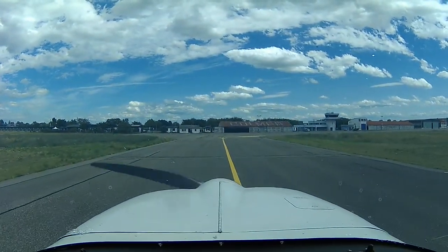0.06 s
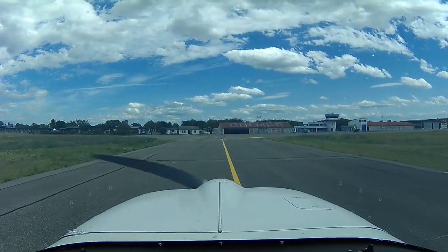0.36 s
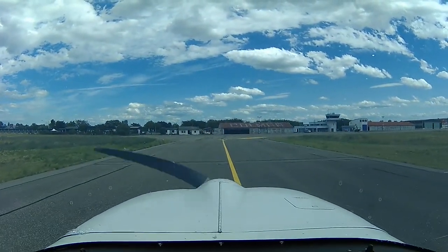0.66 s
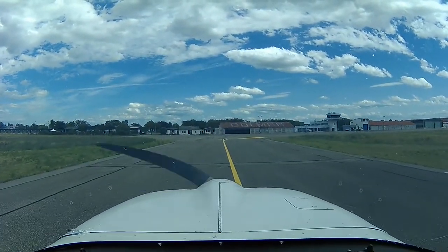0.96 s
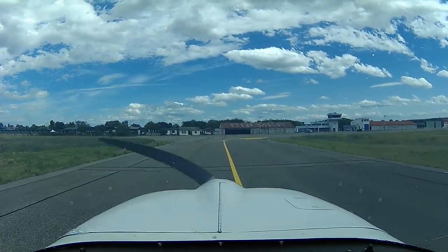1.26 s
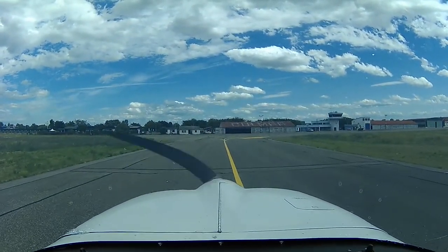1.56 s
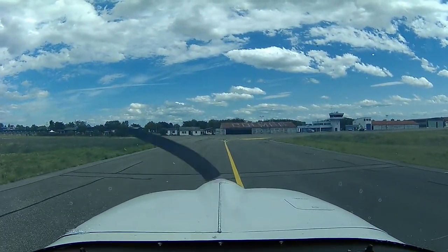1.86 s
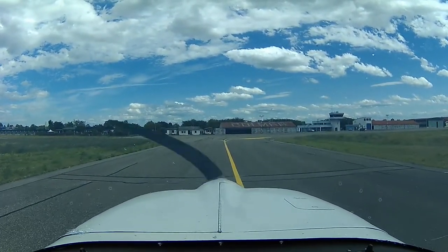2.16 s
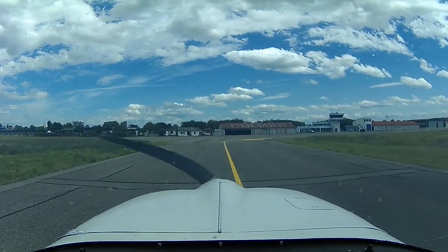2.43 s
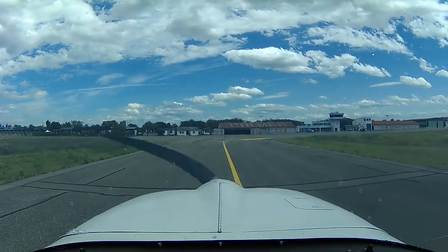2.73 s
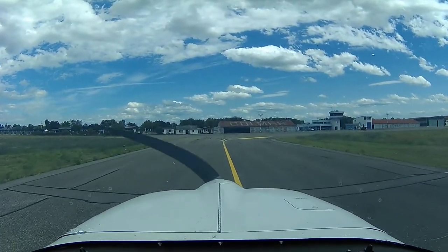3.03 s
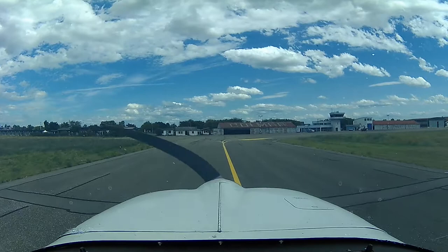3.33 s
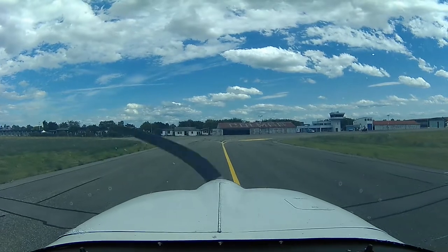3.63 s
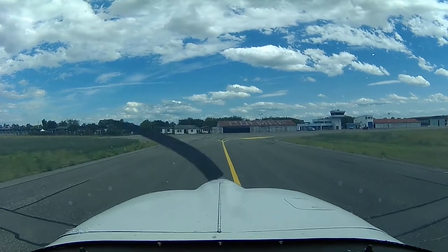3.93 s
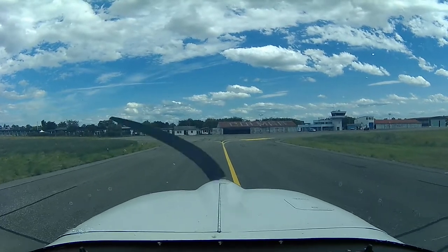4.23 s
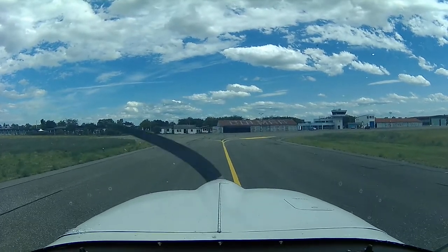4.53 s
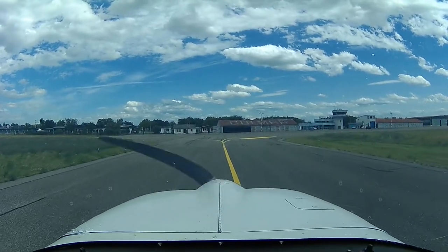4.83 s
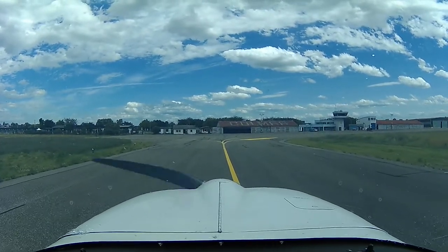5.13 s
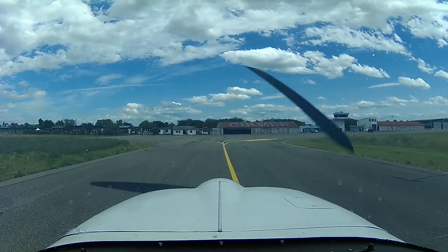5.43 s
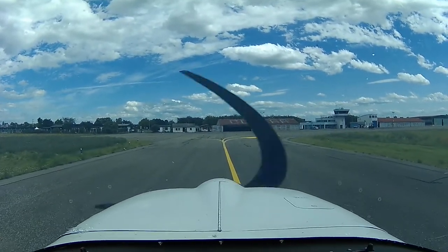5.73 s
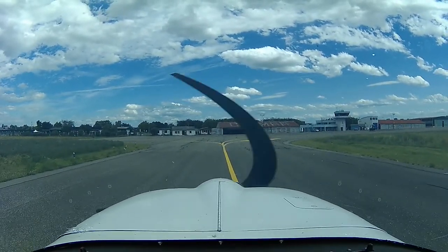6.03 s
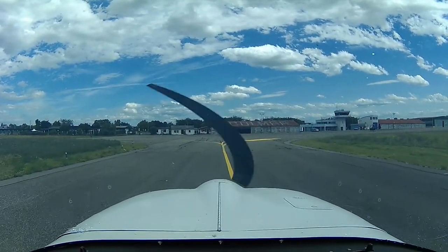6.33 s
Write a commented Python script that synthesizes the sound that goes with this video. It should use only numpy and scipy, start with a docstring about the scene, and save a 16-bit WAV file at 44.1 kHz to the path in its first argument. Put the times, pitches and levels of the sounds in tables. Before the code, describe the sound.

From the cockpit of a small taxiing plane comes a continuous, deep engine and propeller drone at nearly constant speed. A rough, fluttering roar of air and exhaust rides on it, distorted and harsh through a small overloaded microphone. Rolling rumble, tyre hum and slight bumps lie beneath, with scattered light ticks from the cabin trim. The roar and tyre hum grow slightly in the second half, then ease.

```python
"""A light aircraft's propeller and engine boom through the cockpit as it taxis at low power.
Under the drone sits a roar of prop wash and exhaust; the tyres hum, pavement joints jolt the
airframe, and loose trim ticks now and then. The boom overloads a small microphone: each swing
pins it and chops the roar into a rasp, which rings in the microphone."""
import sys
import numpy as np
from scipy import signal
from scipy.fft import rfft, irfft
from scipy.io import wavfile
from scipy.ndimage import uniform_filter1d

SR = 44100
rng = np.random.default_rng(int(sys.argv[2]) if len(sys.argv) > 2 else 0)


def to_wav(sig):
    """Store sig (one row per channel, or 1-D mono) as 16-bit WAV at the path in sys.argv[1].

    Samples outside -1..1 are clipped; the rate is SR.
    """
    pcm = np.clip(np.atleast_2d(sig), -1, 1) * 32767
    pcm = np.round(pcm).astype(np.int16)
    wavfile.write(sys.argv[1], SR, pcm.T)  # frames by channels


N = 290619
TIME = np.arange(N) / SR

# bright ring of the loose trim: freq_hz, relative_db
TRIM_SPECTRUM = [(1000, -41.5), (3000, 2.5), (4500, 0.5), (5600, 10), (7000, -25), (14000, -17)]
# the clear trim ticks: start_s, level_db
TRIM_TICKS = [(0.492, -24), (2.408, -20.5), (2.533, -32), (3.281, -25), (3.843, -25), (3.998, -28),
              (5.033, -26), (6.029, -25), (6.514, -24)]
# hum of the tyres: freq_hz, relative_db
TYRE_SPECTRUM = [(60, -33), (140, -5), (170, 0), (205, -2), (330, -31.5), (1000, -78)]
# tyre hum riding the changing pavement: time_s, level_db
TYRE_LEVEL = [(0, -39), (1.55, -43), (1.9, -33.5), (2.9, -37), (5.0, -28.5), (6.59, -38)]
# low end of the rolling airframe: freq_hz, relative_db
RUMBLE_SPECTRUM = [(5, -12.5), (20, 4.5), (50, -4), (90, -19), (250, -34.5), (1000, -77)]
# wheels crossing pavement joints: start_s, relative_db
PAVEMENT_JOINTS = [(0.31, -27.5), (0.897, -28.5), (1.517, -25), (2.949, -36.5), (5.927, -29)]
# wash and exhaust as heard in the cabin: freq_hz, relative_db
ROAR_SPECTRUM = [(30, -30), (70, -0.5), (150, -0.5), (300, -9), (500, -10.5), (900, -14), (1800, -13.5),
                 (4000, -29), (10000, -39.5), (16000, -53)]
# rise and fall of the roar as the aircraft rolls: time_s, swell (unitless)
ROAR_SWELL = [(0, -0.2), (1.3, -1.56), (2.3, 0.24), (3, -0.7), (4.3, 0.96), (5.3, 0.8), (6.59, -0.8)]
# resonances of the cabin air: centre_hz, width_hz, gain_db
CABIN_RESONANCES = [(425, 70, 6.5), (715, 90, 6), (940, 90, 2.5)]
# crankshaft speed: time_s, speed_hz
CRANK_SPEED = [(0, 33.46), (1.5, 33.44), (2.1, 33.38), (3.95, 33.39), (5.2, 32.66), (6.59, 33.13)]
# swell of the drone's upper tone, at four times crankshaft speed: time_s, relative_db
UPPER_TONE_SWELL = [(0, -40), (0.4, -40), (1.2, -35), (3.2, -34.5), (4.1, -38), (5.55, -36.5),
                    (6.05, -55.5), (6.59, -38.5)]
# weaker engine tones: crank_multiple, level_db
ENGINE_OVERTONES = [(1, -42.5), (1.5, -36.5), (2.5, -47), (4.5, -44), (5, -37.5), (6, -38), (8, -48),
                    (9, -46.5)]
# tone of the microphone in its housing: freq_hz, gain_db
MIC_RESPONSE = [(8, -16.5), (30, -3), (300, 2), (450, 6.5), (800, 11), (1200, 16), (2000, 18), (3000, 17),
                (3600, 9), (5000, -3.5), (6500, -13.5), (9800, -10), (11000, -16.5), (12500, -53.5)]
# ringing peaks of the microphone, and two narrow dips in the high treble: centre_hz, width_hz, gain_db
PEAKS_AND_DIPS = [(1376, 280, 6), (2090, 210, 3.5), (2960, 260, 1), (5930, 590, -16), (8120, 1000, -18)]


def gain_of(db):
    """Decibels to amplitude."""
    return 10 ** (np.asarray(db) / 20)


def automation(points):
    """A (time_s, value) curve, one value a sample."""
    return np.interp(TIME, *np.transpose(points))


def eq_curve(points, hz):
    """Gain in dB, drawn in straight lines on a log-frequency axis."""
    freq_hz, db = np.transpose(points)
    return np.interp(np.log(hz + 1), np.log(freq_hz), db)


def eq_bells(bells, hz):
    """Gain in dB of bell-shaped peaks and dips."""
    return sum(db / (1 + (2 * (hz - centre) / width) ** 2) for centre, width, db in bells)


def noise(spectrum, resonances=()):
    """Noise of rms 1 with the given spectrum and resonances."""
    hz = np.fft.rfftfreq(N, 1 / SR)
    colour = gain_of(eq_curve(spectrum, hz) + eq_bells(resonances, hz))
    shaped = irfft(rfft(rng.standard_normal(N)) * colour, N)
    return shaped / np.std(shaped)


def wander(rate_hz, count=24):
    """Slow random drift of rms 1, no faster than the given rate."""
    hz, t = rate_hz * np.geomspace(.1, 1, count), TIME[::256]
    drift = np.sin(2 * np.pi * (hz * t[:, None] + rng.random(count))).sum(1)
    return np.interp(TIME, t, drift / np.std(drift))


def trim_ticks(t60_s=0.018, faint_db=-36, spread_db=3, faint_count=40):
    """Short bright ticks of loose trim: a few clear ones among many faint ones at random moments."""
    faint = [(when * TIME[-1], faint_db + spread_db * (2 * size - 1))
             for when, size in rng.random((faint_count, 2))]
    hits = np.zeros(N)
    for start_s, db in [*TRIM_TICKS, *faint]:
        hits[int(start_s * SR)] += gain_of(db)
    decay = gain_of(-60 / (t60_s * SR))
    envelope = signal.lfilter([1], [1, -decay], hits + 1e-12)
    return envelope * noise(TRIM_SPECTRUM)


def fitting_clink(level_db=-27.5, start_s=5.005, end_s=5.027, ring_hz=2900, width_hz=650, ring_db=21):
    """A loose fitting chatters once: a brief rough ring."""
    contact = uniform_filter1d(1. * (TIME > start_s) * (TIME < end_s), size=130)  # soft-edged gate
    return gain_of(level_db) * contact * noise(TRIM_SPECTRUM, [(ring_hz, width_hz, ring_db)])


def tyre_hum():
    """The rolling tyres hum low, louder or softer with the pavement."""
    return gain_of(automation(TYRE_LEVEL)) * noise(TYRE_SPECTRUM)


def airframe_rumble(bed_db=-29, jolt_db=3, attack_s=0.038):
    """The wheels shake the airframe; each pavement joint adds a jolt, quick to rise, slower to fall."""
    jolts = np.zeros(N)
    for start_s, db in PAVEMENT_JOINTS:
        age = np.maximum(TIME - start_s, 0) / attack_s
        jolts += gain_of(db) * age * np.exp(1 - age)
    return (gain_of(bed_db) + gain_of(jolt_db) * jolts) * noise(RUMBLE_SPECTRUM)


def crank_angle(start_turn=.54):
    """How far the crankshaft has turned, in radians."""
    return 2 * np.pi * (start_turn + np.cumsum(automation(CRANK_SPEED)) / SR)


def firings(angle):
    """No two firings burn alike: a random strength for each, two to a turn."""
    strength = rng.standard_normal(size=512)
    return np.interp(angle / np.pi, np.arange(len(strength)), strength)


def wash_and_exhaust(angle, level_db=-24.5, swell_db=1.2, throb_db=0.2, uneven_db=1.2,
                     gust_db=0.3, gust_hz=5):
    """A roar through the cabin walls, throbbing once a turn and chugging with the uneven firings."""
    chug_db = throb_db * np.cos(angle - 1) + uneven_db * firings(angle)
    drift_db = swell_db * automation(ROAR_SWELL) + gust_db * wander(gust_hz)
    return gain_of(level_db + drift_db + chug_db) * noise(ROAR_SPECTRUM, CABIN_RESONANCES)


def engine_drone(angle, blade_db=-23.5, middle_db=-30, upper_db=-29, uneven_lag_rad=.9):
    """Two blades and two firings a turn give suction pulses (even orders), uneven cylinders the rest."""
    swell_db = automation(UPPER_TONE_SWELL)
    swell_db -= swell_db.mean()
    # as the upper tone swells, the middle tone follows and the blade tone gives way a little
    tones = [(2, blade_db - .2 * swell_db), (3, middle_db + .68 * swell_db), (4, upper_db + swell_db)]
    drone = np.zeros(N)
    for order, db in [*tones, *ENGINE_OVERTONES]:  # half orders: a four-stroke cycle lasts two turns
        tone = np.sin(order * angle - uneven_lag_rad) if order % 2 else -np.cos(order * angle)
        drone += np.sqrt(2) * gain_of(db) * tone
    return drone


def scene():
    """The cabin mix in mono: roar and rolling bed, small rattles, and the drone on top."""
    angle = crank_angle()
    bed = wash_and_exhaust(angle) + airframe_rumble() + tyre_hum()
    return (bed + trim_ticks() + fitting_clink() + engine_drone(angle))[None]


def mic_colour(size=8192):
    """Impulse response: the microphone's presence lift and ringing peaks, and two high treble dips."""
    hz = np.fft.rfftfreq(size, 1 / SR)
    response = gain_of(eq_curve(MIC_RESPONSE, hz) + eq_bells(PEAKS_AND_DIPS, hz))
    # minimum phase, so the ringing comes only after each hit
    cepstrum = irfft(np.log(response))
    cepstrum[1:size // 2] *= 2
    cepstrum[size // 2 + 1:] = 0
    return irfft(np.exp(rfft(cepstrum)))[:size // 2]


def record(dry, overload_db=-25, hiss_db=-59, high_cut_hz=11800):
    """The boom pins the microphone and chops the roar; then faint hiss, mic colour and a high cut."""
    limit = gain_of(overload_db)
    picked_up = np.clip(dry, -limit, limit) + gain_of(hiss_db) * rng.standard_normal(N)
    coloured = signal.oaconvolve(picked_up, mic_colour()[None])
    low_pass = signal.firwin(511, high_cut_hz, window=("kaiser", 9), fs=SR)
    return signal.oaconvolve(coloured, low_pass[None], "same")[:, :N]


dry = scene()
out = record(dry)
to_wav(out)
```